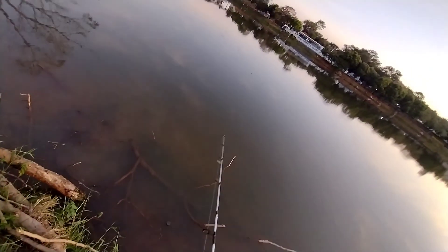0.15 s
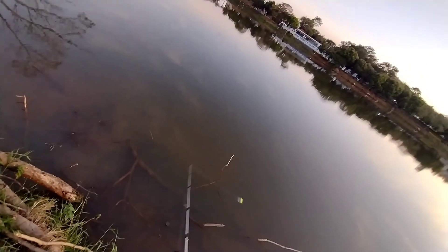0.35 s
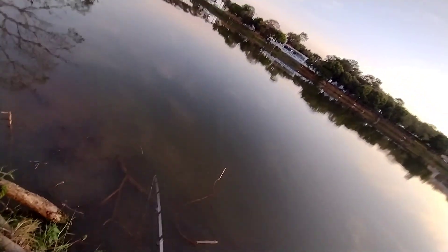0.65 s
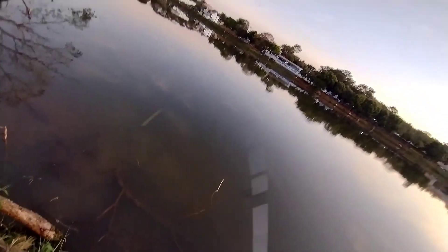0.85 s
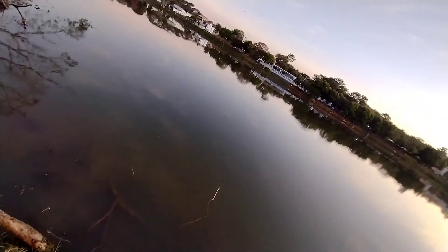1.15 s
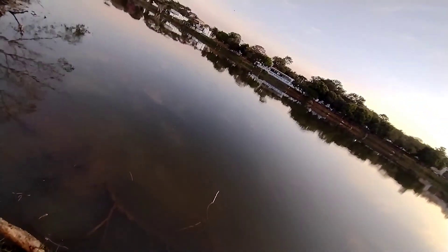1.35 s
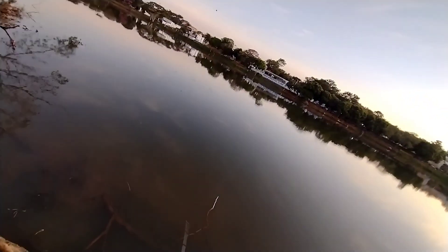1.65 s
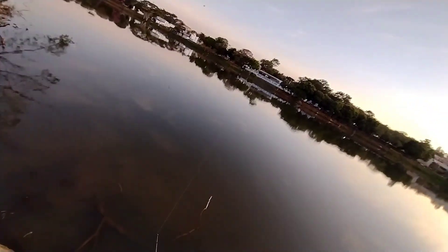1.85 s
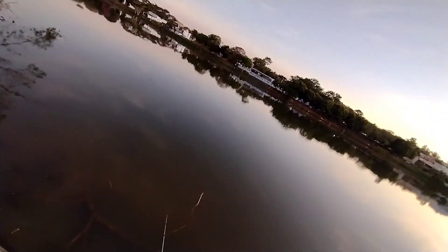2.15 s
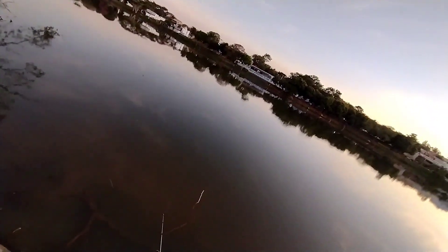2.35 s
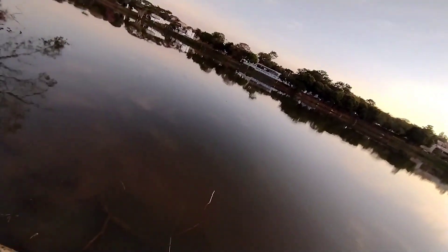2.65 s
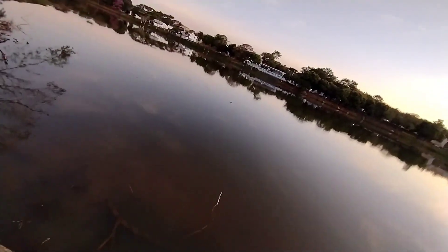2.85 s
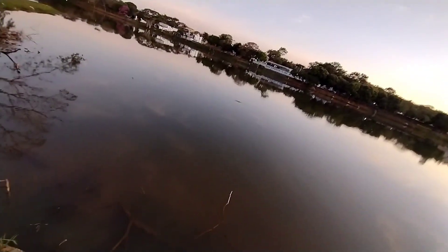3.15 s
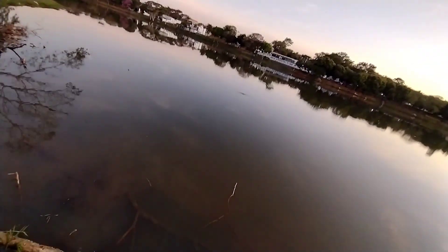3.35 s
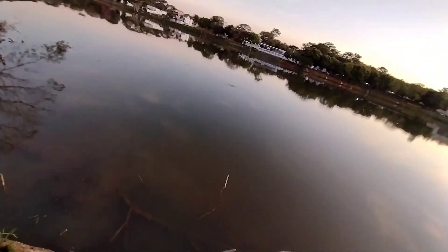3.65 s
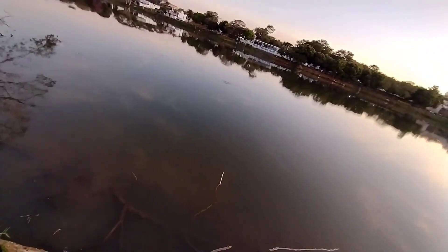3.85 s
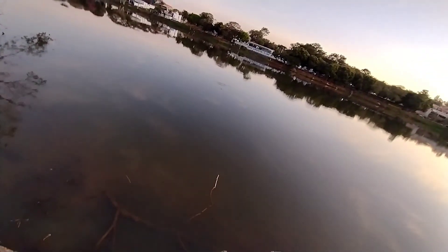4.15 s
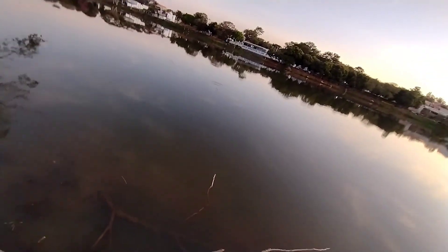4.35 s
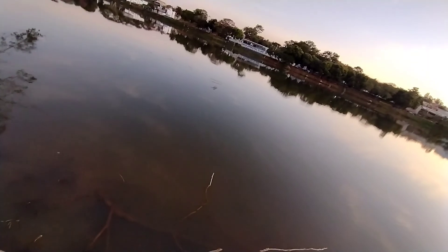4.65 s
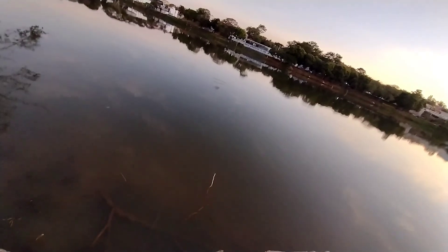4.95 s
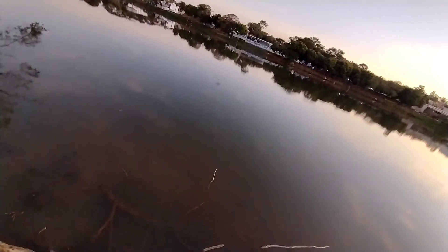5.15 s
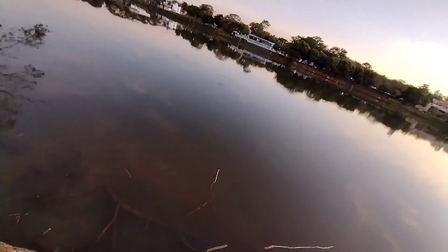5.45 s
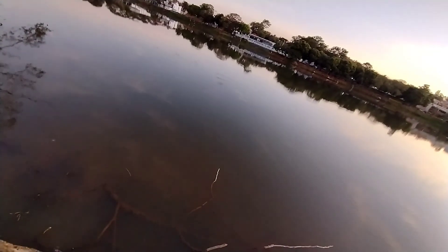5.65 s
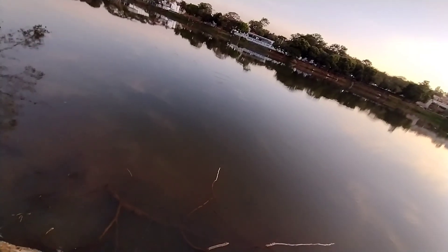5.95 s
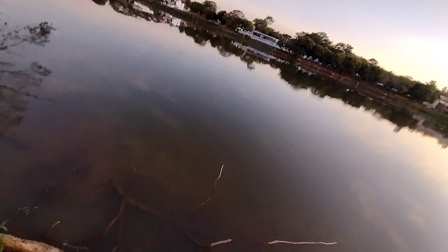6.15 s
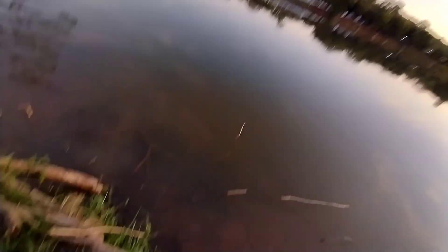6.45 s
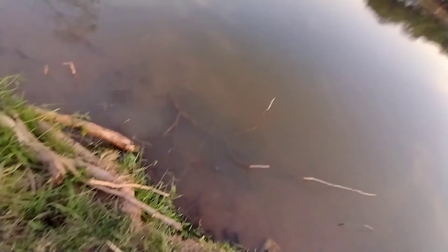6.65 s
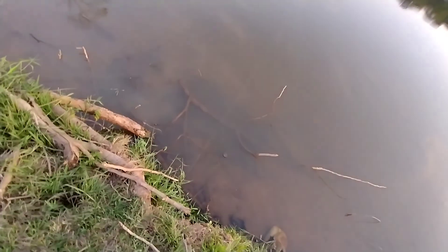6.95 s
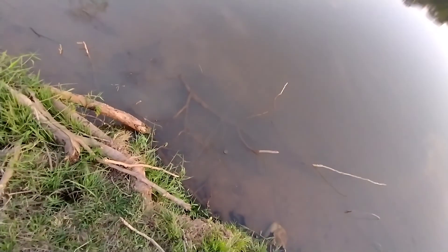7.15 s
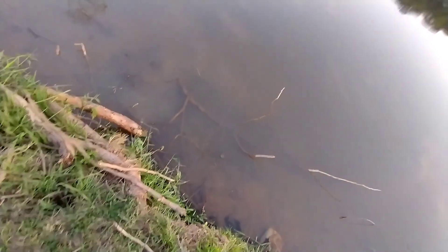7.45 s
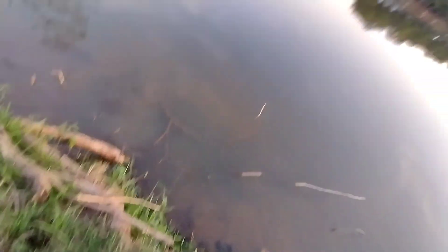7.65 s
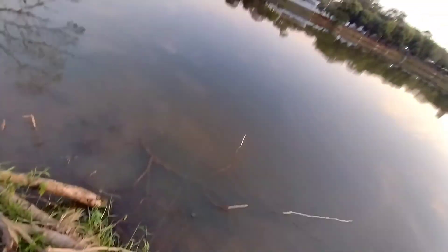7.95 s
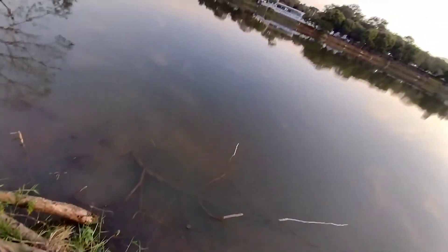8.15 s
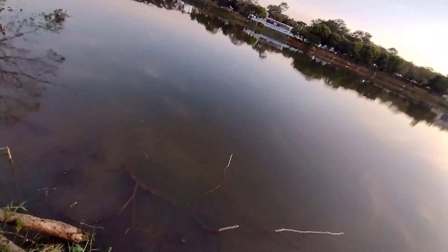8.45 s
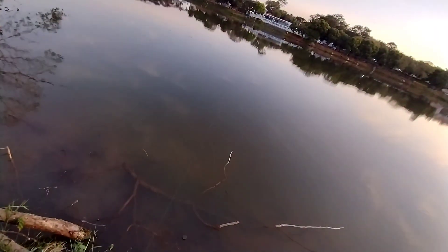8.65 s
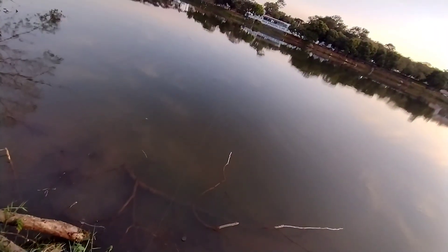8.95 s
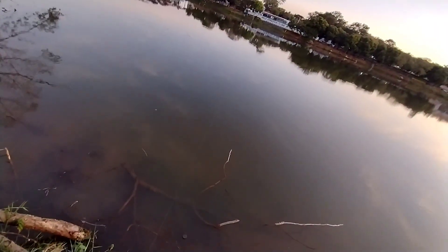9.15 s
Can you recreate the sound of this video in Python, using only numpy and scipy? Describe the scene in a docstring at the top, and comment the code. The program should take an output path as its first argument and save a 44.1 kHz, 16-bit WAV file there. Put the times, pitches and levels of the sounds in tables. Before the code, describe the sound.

Outdoors beside a lake, a near cricket chirps in a fast, high, almost unbroken stream, hesitant for the first half second and then steady to the end. Behind it are far trilling insects, low road rumble and a little wind on the microphone. From about 0.9 seconds a distant truck pulls away with a low rising hum, changing gear near 5 seconds. At 1.5 seconds a fishing rod swishes with a click, and line hisses off the spool, fading over a second. The reel gives one sharp click at 2.6 seconds, then scattered lighter ticks until about 7 seconds. Small drops plop into the water from 2.4 seconds, thickest between 3 and 5. Faint far birds whistle around 5 seconds, and a tiny splash fizzes at 5.8. A second engine, entering at 3.5 seconds, gathers speed and nears as the rumble swells to the end, just past 9 seconds.

```python
"""Dusk at a lake. From the start, far insects trill over road rumble and a little wind, and a near
cricket chirps, one falling tone to each wing stroke. At 0.9 s a far truck begins to pull away.
At 1.5 s a fishing rod swishes through the air and line hisses off the spool; then the reel ticks
and drops plop as ringing bubbles. From 3.5 s a second engine gathers speed and nears to the end;
meanwhile far birds whistle around 5 s and a small splash fizzes at 5.8 s."""
import sys
import numpy as np
from scipy import signal
from scipy.io import wavfile
from scipy.ndimage import uniform_filter1d

SR = 44100
rng = np.random.default_rng(int(sys.argv[2]) if len(sys.argv) > 2 else 0)


def master_out(mix):
    """Clip the mix to full scale and print it as 16-bit PCM to the path in sys.argv[1]."""
    frames = np.transpose(np.atleast_2d(mix))
    ceiling = np.clip(frames, -1, 1)
    pcm = np.round(ceiling * 32767).astype(np.int16)
    wavfile.write(sys.argv[1], SR, pcm)


N = 410571

# Noise spectra: frequency_hz, relative_density_db
RUMBLE_SPECTRUM = [(8.8, -31), (15, -12.5), (48, -3), (97, -4), (149, -7.5), (258, -14.5), (328, -23.5),
                   (438, -19.5), (567, -26.5), (758, -31.5), (900, -42.5), (1170, -55), (1980, -120)]  # far traffic
ROAR_SPECTRUM = [(180, -28), (300, -4), (524, -11), (940, -11), (1350, -13.5), (3390, -19), (4230, -16.5),
                 (4730, -20), (5220, -26), (6000, -25), (6520, -34.5), (7500, -27), (8380, -55),
                 (10900, -83), (18400, -120)]  # tyre roar and far insect haze
SWISH_SPECTRUM = [(150, -50), (250, 6), (418, 1.5), (604, 1.5), (872, 3.5), (1500, -3.5), (2910, -13.5),
                  (5000, -44)]  # thick part of the rod
WHIP_SPECTRUM = [(900, -28), (1700, 1.5), (2910, -2), (4600, -1), (5980, -9), (6920, -15), (8380, -40)]  # thin rod tip
LINE_SPECTRUM = [(2940, -8.5), (5000, -6), (6020, -4.5), (6370, -3), (7490, 1.5), (7970, -9), (8380, -31),
                 (10900, -42), (18400, -120)]  # line leaving the spool
WIND_SPECTRUM = [(18, -19), (30, -13), (42, .5), (52, -6.5), (60, -28.5)]
SPLASH_SPECTRUM = [(700, -20), (1200, 3), (2250, 3), (3000, -3), (4500, -20)]
HISS_SPECTRUM = [(8600, -4), (10000, -6), (12500, 0), (15600, -3)]
# Envelopes of those noises: time_s, level_db
RUMBLE_LEVELS = [(0.0, -37.5), (2.0, -37.5), (3.5, -35), (4.3, -33.5), (5.3, -40), (5.6, -36.5), (7.0, -35),
                 (9.0, -33), (9.31, -28.5)]
ROAR_LEVELS = [(0.0, -48.5), (1.7, -47), (2.85, -47), (4.1, -45.5), (5.3, -46.5), (7.7, -47), (8.7, -45.5),
               (9.31, -46.5)]
SWISH_LEVELS = [(1.45, -60), (1.49, -47), (1.5, -44), (1.525, -45), (1.55, -32), (1.57, -37), (1.59, -40),
                (1.61, -48), (1.63, -60)]
WHIP_LEVELS = [(1.49, -60), (1.512, -52), (1.52, -41), (1.527, -45), (1.539, -30.5), (1.55, -35),
               (1.575, -40), (1.59, -43), (1.615, -58)]
LINE_LEVELS = [(1.45, -71), (1.49, -43), (1.53, -45), (1.54, -31), (1.6, -47), (1.65, -50), (1.93, -50),
               (2.5, -59), (2.58, -60)]
WIND_LEVELS = [(0.0, -39), (1.4, -39), (2.6, -36.5), (3.0, -38.5), (4.07, -45), (4.24, -30.5), (4.43, -36),
               (5.3, -42.5), (5.8, -40.5), (8.4, -53), (9.31, -47)]  # one strong puff
SPLASH_LEVELS = [(5.82, -70), (5.833, -47), (5.855, -46), (5.9, -51), (5.94, -62)]
# Gliding tones: time_s, pitch_hz, level_db
TRUCK_LOW_GEAR = [(.9, 62.3, -42), (1.02, 60, -35), (1.31, 55.47, -34.5), (1.99, 60, -32),
                  (2.7, 66.77, -27.5), (2.93, 70.64, -38), (3.27, 75.4, -27), (3.531, 78.8, -40.5),
                  (3.78, 83.1, -29.5), (4.0, 83.46, -35), (4.2, 85, -35), (4.5, 82.7, -49.5)]
TRUCK_HIGH_GEAR = [(5.2, 46.8, -45), (5.6, 50.1, -46), (5.9, 51.52, -32), (7.25, 57.87, -33),
                   (7.45, 59.36, -41), (7.7, 61.2, -33.5), (8.3, 64.6, -30.5), (8.5, 66.3, -44),
                   (8.7, 65.8, -50)]
GEAR_WHINE = [(6.7, 485, -67), (7.1, 512, -61), (7.5, 535, -60), (7.9, 562, -59), (8.3, 595, -59),
              (8.8, 612, -65)]
FAR_HUM = [(6.8, 752, -72), (7.3, 762, -65), (8.5, 785, -64), (9.0, 790, -72)]  # a thin tone creeping up
BIRD_WHISTLES = [
    [(4.69, 2900, -67), (4.75, 3110, -62), (4.85, 3170, -62), (4.95, 3170, -62), (5.05, 2900, -67)],
    [(4.755, 4720, -57), (4.795, 4230, -59)],
    [(4.788, 5300, -62), (4.806, 6300, -58)],
    [(4.812, 5500, -52), (4.835, 5750, -52), (4.87, 5950, -58)],
    [(5.1, 5150, -65), (5.142, 5700, -59)],
]  # one table a whistle
# The second engine: time_s, cycle_rate_hz, level_db
ENGINE_RUN = [(3.5, 13.65, -54), (4.9, 14.15, -48), (5.3, 14.35, -43), (6.1, 14.95, -42.5),
              (7.35, 16.1, -42), (7.8, 16.45, -41), (8.3, 16.85, -39.5), (9.31, 17.7, -38)]
# Its harmonics: multiple, gain_db
ENGINE_ORDERS = [(1, -16), (2, -12), (3, -8), (4, -2), (5, 0), (6, -2), (7, -9), (8, -3), (9, -3),
                 (10, -13), (11, -7), (12, -3), (13, -8), (14, -11), (15, -21), (16, -9), (17, -13),
                 (18, -10), (19, -15), (20, -18), (21, -21), (22, -23)]
# Far insects: pitch_hz, pulse_rate_hz, slide_hz, blur_share, trills as (start_s, end_s, level_db)
INSECTS = [(4158, 38, 0, .004, [(.08, .6, -53), (1.75, 2.22, -53.5), (3.3, 3.78, -54), (4.95, 5.35, -58),
           (6.53, 7.02, -54), (8.2, 8.63, -57.5)]), (4265, 40, 170, .008, [(0, .5, -56), (1.6, 2.05, -55),
           (3.05, 3.6, -55.5), (4.6, 5.05, -58), (5.7, 6.5, -58), (7.52, 8.2, -55.5)]),
           (4200, 40, 0, .006, [(.6, 1.12, -59), (2.3, 2.8, -58.5), (4.15, 4.6, -59)]),
           (4605, 45, 220, .008, [(0, .28, -54), (1.1, 1.8, -58), (1.95, 2.4, -60), (2.45, 3.25, -56),
           (3.7, 4.5, -58), (4.95, 5.4, -57.5), (5.8, 6.65, -57), (7.3, 7.9, -57), (8.7, 9.31, -55.5)]),
           (3820, 40, 0, .008, [(.7, 1.2, -60), (2.35, 3.05, -59), (7.5, 8.3, -59)]),
           (3080, 34, 0, .005, [(6.75, 7.1, -54)]), (6220, 35.5, 0, .005, [(0, 9.31, -60)])]
# The clearest drops: start_s, peak_db, pitch_hz
DROPS = [(2.3935, -48, 2100), (2.4555, -39, 2240), (3.046, -38, 2740), (3.225, -39, 1570),
         (3.5683, -40, 2250), (3.6531, -42, 2050), (3.7379, -33, 2040), (3.9828, -39, 2118),
         (4.13, -38, 1994), (4.145, -38, 2328), (4.168, -39, 1900), (4.195, -43, 2260), (4.3026, -39, 2004),
         (4.3799, -34.5, 2230), (4.4304, -37, 2480), (4.4572, -40.5, 2880), (4.5066, -39, 2200),
         (4.583, -37, 2300), (4.61, -39, 1950), (4.6877, -40, 1960), (4.8344, -42, 2040),
         (4.9576, -41, 2180), (5.0564, -44, 2020), (5.5567, -43, 2120), (5.8331, -39, 2130),
         (5.851, -39, 2250), (5.888, -48, 2150)]
# Reel ticks: start_s, level_db, low_mode_gain_db
TICKS = [(.7377, -39, -2), (1.4574, -42, 3), (1.569, -23, -18), (2.6036, -31, -8), (2.6123, -19.5, -7.5),
         (2.6153, -30, -10), (2.6198, -36, -5), (2.831, -41, -4), (3.017, -41, 1), (3.1876, -48, 0),
         (3.2598, -46, -12), (3.2628, -32, -13), (3.265, -32, -6), (3.8684, -49, 6), (3.8812, -41, 2),
         (3.932, -53, 6), (4.3905, -49, 5), (4.4434, -51, 4), (4.6259, -47, 0), (4.9192, -45, -2),
         (5.5885, -49, 0), (5.7488, -42, -4), (6.688, -53, 0), (7.0643, -45, -7), (7.1292, -44, -6),
         (7.1913, -43, -7)]
# Resonances of the reel: frequency_hz, gain_db, t60_s
REEL_MODES = [(7800, -5, .003), (7150, 0, .0045), (6300, -8, .003), (5200, -1, .004), (4300, -5, .004),
              (3300, -8, .005), (2400, -10, .004)]
# The near cricket's chirps: time_s, stroke_count
CHIRPS = [(.2014, 5), (.3091, 4), (.4059, 3), (.4691, 4), (.5404, 4), (.6103, 4), (.6819, 5), (.7593, 4),
          (.8313, 5), (.9124, 5), (.9943, 5), (1.0763, 5), (1.1598, 5), (1.2423, 5), (1.3244, 5),
          (1.4067, 5), (1.4912, 5), (1.574, 5), (1.6563, 5), (1.7387, 5), (1.8222, 5), (1.906, 5),
          (1.991, 5), (2.0736, 5), (2.1581, 5), (2.2434, 5), (2.3284, 6), (2.4216, 5), (2.5053, 5),
          (2.589, 5), (2.675, 5), (2.7605, 5), (2.8442, 5), (2.9305, 5), (3.0146, 5), (3.1008, 6),
          (3.1959, 5), (3.2783, 5), (3.3627, 5), (3.4479, 5), (3.5314, 6), (3.6237, 5), (3.7085, 5),
          (3.7942, 5), (3.8792, 5), (3.9644, 5), (4.05, 5), (4.1358, 5), (4.2192, 5), (4.3053, 5),
          (4.3887, 6), (4.4772, 5), (4.5607, 5), (4.6455, 5), (4.729, 5), (4.8165, 5), (4.9001, 5),
          (4.985, 5), (5.071, 5), (5.1564, 5), (5.242, 5), (5.3297, 5), (5.4138, 5), (5.4963, 5),
          (5.5822, 5), (5.6681, 5), (5.7545, 6), (5.8486, 5), (5.9322, 5), (6.0174, 5), (6.1032, 5),
          (6.1875, 5), (6.272, 5), (6.3562, 5), (6.4417, 5), (6.527, 5), (6.6133, 6), (6.7012, 5),
          (6.7881, 6), (6.882, 5), (6.9653, 5), (7.0498, 5), (7.1345, 5), (7.2197, 5), (7.3044, 6),
          (7.3965, 5), (7.482, 5), (7.5688, 6), (7.6616, 5), (7.7451, 5), (7.8294, 5), (7.9146, 6),
          (8.0063, 5), (8.0903, 6), (8.1841, 5), (8.2667, 5), (8.3506, 5), (8.4351, 6), (8.5298, 5),
          (8.6163, 5), (8.6985, 5), (8.7824, 5), (8.8672, 6), (8.9614, 5), (9.0441, 6), (9.1366, 5),
          (9.2183, 5), (9.3011, 1)]
# Its wing strokes, settling as it sings: time_s, length_s, end_pitch_hz, level_db, first_stroke_gain_db
STROKES = [(.2, 0.0077, 5650, -35, -1), (0.618, 0.0051, 5620, -33.5, -14), (.8, 0.0067, 5640, -30.5, -9),
           (1.198, 0.0062, 5710, -30, -2.5), (2.0, 0.0063, 5810, -28.5, -3),
           (6.298, 0.0057, 5890, -27.5, -3), (6.648, 0.0058, 5840, -30, -2.5), (7.8, 0.0055, 5840, -29, -4),
           (8.2, 0.0059, 5840, -28, -2), (9.31, 0.0059, 5850, -28, -2)]
# Wing pace, hesitant at first: time_s, stroke_period_s
WING_PACE = [(.2, .0156), (.31, .019), (.4, .0105), (.7, .0101), (1.2, .0104), (2.2, .0107), (4.0, .01085),
             (9.3, .0107)]
# Reflections off ground and bank: delay_s, gain_db
ECHOES = [(.000689, -2.5), (.0024, -13), (.003574, -9.5), (.0052, -24), (.0075, -21)]


def gain_of(db):
    """Amplitude grows tenfold every 20 dB."""
    return 10 ** (np.asarray(db) / 20)


def unit_rms(x):
    """Normalisation to a mean power of 1."""
    return x / np.sqrt(np.mean(x ** 2) + 1e-20)


def add(mix, start_s, sound):
    """Superposition: a sound sums into the mix."""
    part = mix[max(round(start_s * SR), 0):][:len(sound)]
    part += sound[:len(part)]


def envelope(rows):
    """Amplitude envelope, linear in decibels and silent outside its rows."""
    time_s, db = np.transpose(rows)
    return gain_of(np.interp(np.arange(N) / SR, time_s, db, left=-150, right=-150))


def wander(length, rate_hz):
    """Smooth random modulation of rms 1."""
    knots = rng.standard_normal(int(length / SR * rate_hz) + 2)
    curve = np.interp(np.arange(length) * rate_hz / SR, np.arange(len(knots)), knots)
    return unit_rms(uniform_filter1d(curve, int(SR / rate_hz / 2) + 1))


def noise(spectrum, patchy_db, size=1024):
    """Spectral shaping: noise of rms 1 with drifting louder and softer patches."""
    hz = np.fft.rfftfreq(size, 1 / SR)
    real, imag, patches = rng.standard_normal((N // (size // 4) + 5, len(hz), 3)).T
    patches = unit_rms(uniform_filter1d(uniform_filter1d(patches, 10, 0), 12, 1))
    knot_hz, db = np.transpose(spectrum)
    shape_db = np.interp(np.log(hz + 1), np.log(knot_hz + 1), db, left=-90, right=-90)[:, None]
    bins = (real + 1j * imag) * gain_of(shape_db + patchy_db * patches)
    return unit_rms(signal.istft(bins, nperseg=size, noverlap=size * 3 // 4)[1][:N])


def glide(rows, waver_db, waver_hz, orders=((1, 0),)):
    """Atmospheric fading: each harmonic of a gliding pitch wavers as the air between shifts."""
    time_s, hz, db = np.transpose(rows)
    t = np.arange(time_s[0], time_s[-1], 1 / SR)
    cycles = np.cumsum(np.interp(t, time_s, hz)) / SR
    swell = np.sqrt(2) * gain_of(np.interp(t, time_s, db)) * signal.windows.tukey(len(t), .08)
    out = np.zeros(N)
    for multiple, order_db in orders:
        fading = gain_of(order_db + waver_db * wander(len(t), waver_hz))
        add(out, time_s[0], swell * fading * np.sin(2 * np.pi * (multiple * cycles + rng.random())))
    return out


def engines():
    """Periodic firing gives harmonics that rise with speed; only the truck's firing tone carries."""
    truck = sum(glide(gear, waver_db=1, waver_hz=13) for gear in (TRUCK_LOW_GEAR, TRUCK_HIGH_GEAR))
    nearing = glide(ENGINE_RUN, waver_db=2.37, waver_hz=6, orders=ENGINE_ORDERS)
    whines = sum(glide(rows, waver_db=4, waver_hz=15) for rows in (GEAR_WHINE, FAR_HUM))
    return truck + nearing + whines


def traffic():
    """Incoherent sources merge into broadband noise: road rumble, tyre roar and a haze of insects."""
    rumble = envelope(RUMBLE_LEVELS) * noise(RUMBLE_SPECTRUM, 1.58, size=4096)
    return rumble + envelope(ROAR_LEVELS) * noise(ROAR_SPECTRUM, 1.23)


def wind():
    """Turbulence at the microphone makes deep, gusting pressure fluctuations."""
    gusts = gain_of(wander(N, rate_hz=4))
    return gusts * envelope(WIND_LEVELS) * noise(WIND_SPECTRUM, 1.8, size=4096)


def birds():
    """Far whistles are nearly pure tones, gliding in pitch and fluttering in level."""
    return sum(glide(rows, waver_db=3.5, waver_hz=120) for rows in BIRD_WHISTLES)


def far_insects(slide_s=.05):
    """Amplitude modulation: pulsed tones, blurred by distance; some slide up into pitch."""
    out = np.zeros(N)
    for hz, pulse_hz, slide_hz, blur, trills in INSECTS:
        for start_s, end_s, db in trills:
            n = int((end_s - start_s) * SR)
            beats = np.cumsum(pulse_hz * (1 + .024 * wander(n, 3.4))) / SR
            pitch_hz = hz * (1 + blur * wander(n, 150)) - slide_hz * np.exp(-np.arange(n) / SR / slide_s)
            tone = np.sin(2 * np.pi * np.cumsum(pitch_hz) / SR)
            pulses = .25 + 1.1 * np.sin(np.pi * beats) ** 4
            swell = gain_of(db + 1.5 * wander(n, 20)) * signal.windows.tukey(n, min(.06 * SR / n, 1))
            add(out, start_s, tone * pulses * swell)
    return out


def water():
    """Bubble resonance: each drop rings briefly with a rising pitch; one splash fizzes."""
    out, t = np.zeros(N), np.arange(SR // 60) / SR
    droplets = rng.uniform([3.2, -53, 1500], [5.3, -46, 2600], (420, 3))  # columns as in DROPS
    for start_s, peak_db, hz in [*DROPS, *droplets]:
        wobble = .1 * np.cumsum(rng.standard_normal(len(t)))
        ring = np.sin(2 * np.pi * hz * (t + 3.6 * t ** 2) + wobble)
        bubble = ring * gain_of(-60 * t / .014) * (1 - np.exp(-t / .0004))
        add(out, start_s, gain_of(peak_db) * bubble / abs(bubble).max())
    return out + envelope(SPLASH_LEVELS) * noise(SPLASH_SPECTRUM, 2.5, size=256)


def reel():
    """Modal ringing: each tick excites damped metal modes, the high ones first, and a short rattle."""
    out, t = np.zeros(N), np.arange(SR // 30) / SR
    hz, mode_db, t60_s = np.transpose(REEL_MODES)[:, :, None]
    age_s = np.maximum(t - .0017 * (1 - hz / 8000), 0)
    shape = gain_of(-60 * age_s / t60_s) * (1 - np.exp(-age_s / .001)) ** 2
    shape /= shape.max(axis=1, keepdims=True)
    for start_s, db, low_db in TICKS:
        tuned_hz = hz * rng.uniform(.97, 1.04, hz.shape)
        modes = gain_of(mode_db + low_db * (hz < 6000)) * shape * np.sin(2 * np.pi * tuned_hz * age_s)
        bright_noise = np.diff(rng.standard_normal(len(t) + 1))
        rattle = bright_noise * gain_of(-13 - 60 * t / .05) * np.minimum(t / .002, 1)
        add(out, start_s, gain_of(db) * (modes.sum(axis=0) + rattle))
    return out


def cast():
    """Aerodynamic noise: the thin rod tip whips high, the thick part swishes low; line hisses out."""
    swish = envelope(SWISH_LEVELS) * noise(SWISH_SPECTRUM, 1.5, size=256)
    whip = envelope(WHIP_LEVELS) * noise(WHIP_SPECTRUM, 1.5, size=256)
    line = envelope(LINE_LEVELS) * noise(LINE_SPECTRUM, 2.5, size=256)
    rod_flutter, line_flutter = gain_of(1.5 * wander(N, 250)), gain_of(wander(N, 50))
    return rod_flutter * (swish + whip) + line_flutter * line


def ground_echoes(direct, t60_s=.042):
    """Interference with reflections cuts notches in the spectrum; scattering in grass adds a tail."""
    path = np.zeros(SR // 50)
    path[0] = 1
    for delay_s, db in ECHOES:
        path += gain_of(db) * np.sinc(np.arange(len(path)) - delay_s * SR)
    tail = rng.standard_normal(SR // 8) * gain_of(-60 * np.arange(SR // 8) / SR / t60_s)
    tail *= gain_of(-13.5) / np.linalg.norm(tail)
    return signal.oaconvolve(direct, path)[:N] + signal.oaconvolve(direct, tail)[:N]


def wing_stroke(length_s, end_hz, top_hz=7028):
    """Stridulation: one stroke rings as a falling sweep, with a thin overtone as the wings meet."""
    progress = np.arange(0, length_s, 1 / SR) / length_s
    hz = (top_hz + (end_hz - top_hz) * progress) * rng.normal(1, .0052)
    phase = 2 * np.pi * np.cumsum(hz) / SR
    sweep = np.sin(np.pi * progress ** 1.13) ** 2 * np.sin(phase + 2 * np.pi * rng.random())
    overtone_shape = np.exp(-progress / .36) * np.minimum(progress / .23, 1)
    return sweep + gain_of(-25.5) * overtone_shape * np.sin(1.123 * phase)


def cricket(lead_s=.0044):
    """Each chirp is a pulse train of wing strokes, the first usually weaker."""
    out, (knots_s, *song) = np.zeros(N), np.transpose(STROKES)
    for chirp_s, count in CHIRPS:
        length_s, end_hz, db, first_db = (np.interp(chirp_s, knots_s, column) for column in song)
        first_db -= rng.exponential(.24)
        span_s = (count - 1) * np.interp(chirp_s, *np.transpose(WING_PACE))
        share = np.linspace(0, 1, int(count))
        times_s = chirp_s + span_s * (share - .039 * share * (1 - share))  # strokes slow within a chirp
        for k, time_s in enumerate(times_s):
            stroke_db = rng.normal(db, .95) + first_db * (k == 0)
            add(out, time_s - lead_s, gain_of(stroke_db) * wing_stroke(length_s, end_hz))
    return out


def scene():
    """Superposition of far and near sources in one channel."""
    background = engines() + traffic() + wind() + birds() + far_insects()
    return (background + water() + reel() + cast() + ground_echoes(cricket()))[None]


def record(dry):
    """Band limiting by a steep low-pass filter, plus a faint hiss of the electronics."""
    lowpass = signal.firwin(301, 8480, window=("kaiser", 9), fs=SR)
    return signal.oaconvolve(dry, lowpass[None], "same") + gain_of(-95) * noise(HISS_SPECTRUM, 2.5)


dry = scene()
out = record(dry)
master_out(out)
```